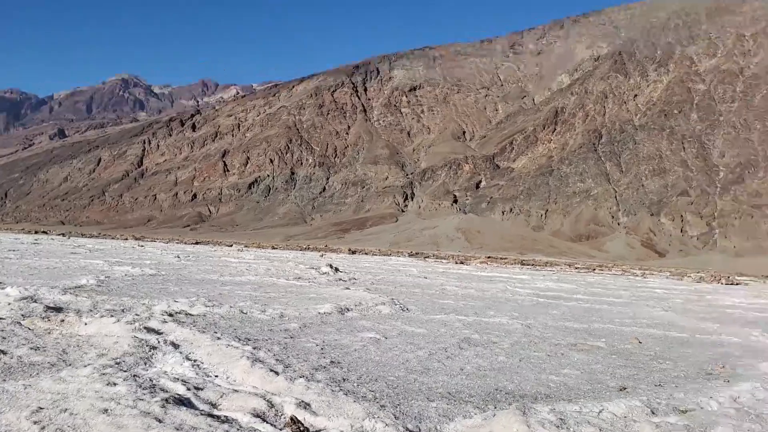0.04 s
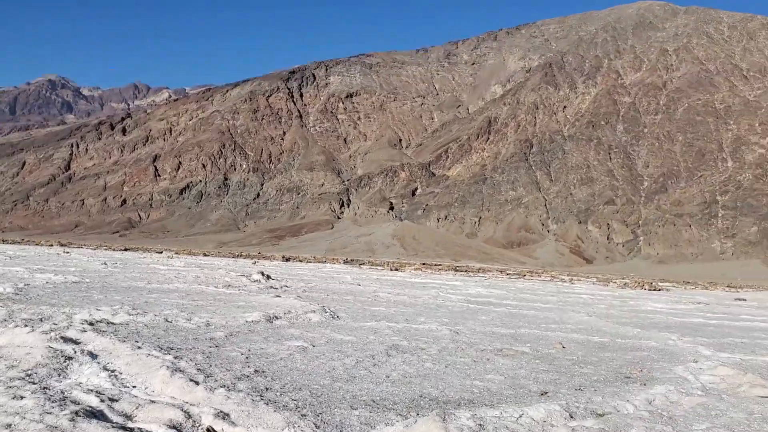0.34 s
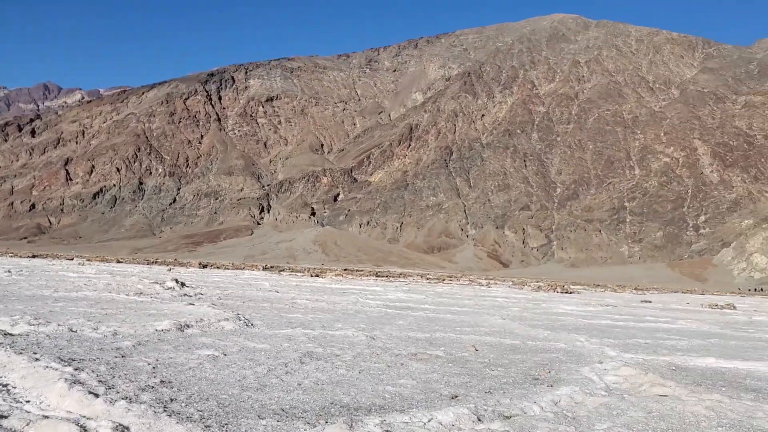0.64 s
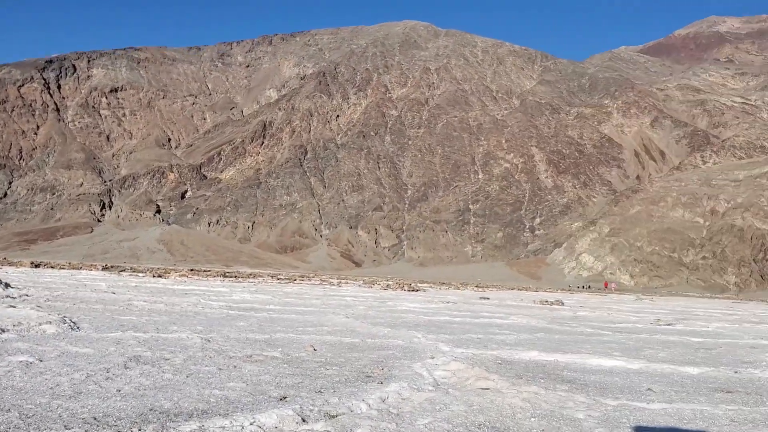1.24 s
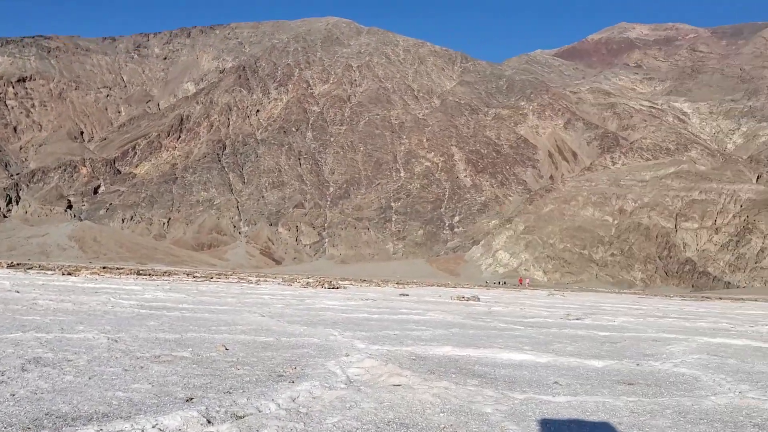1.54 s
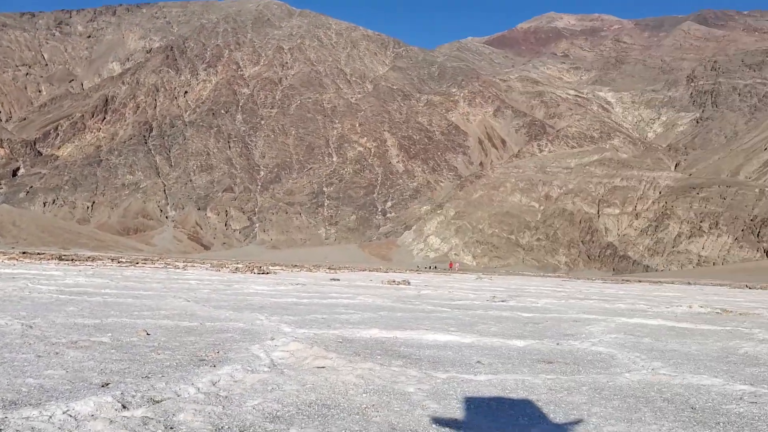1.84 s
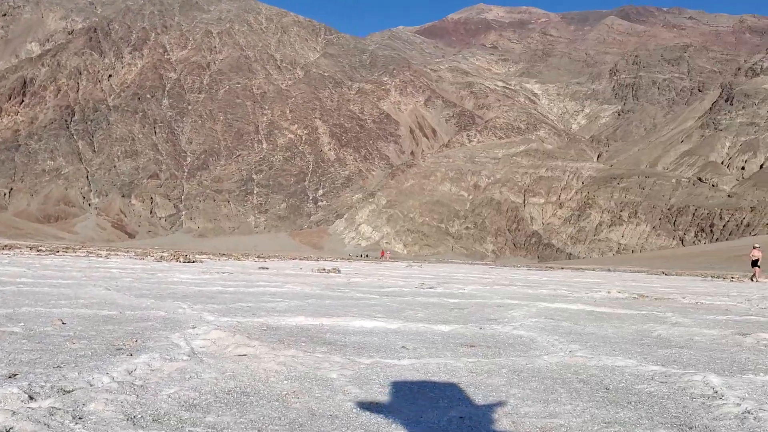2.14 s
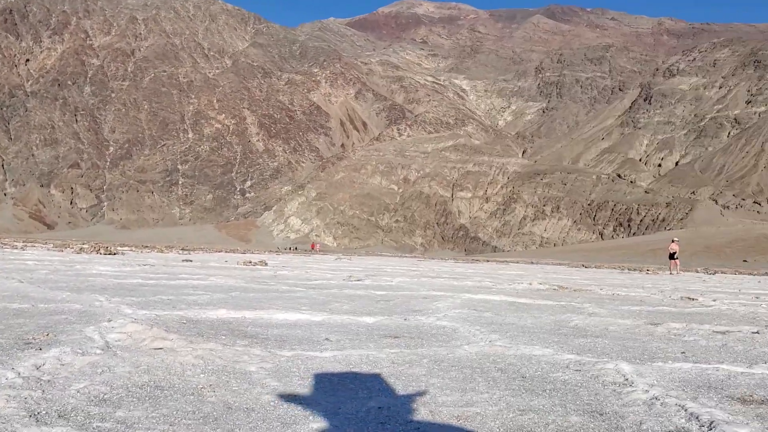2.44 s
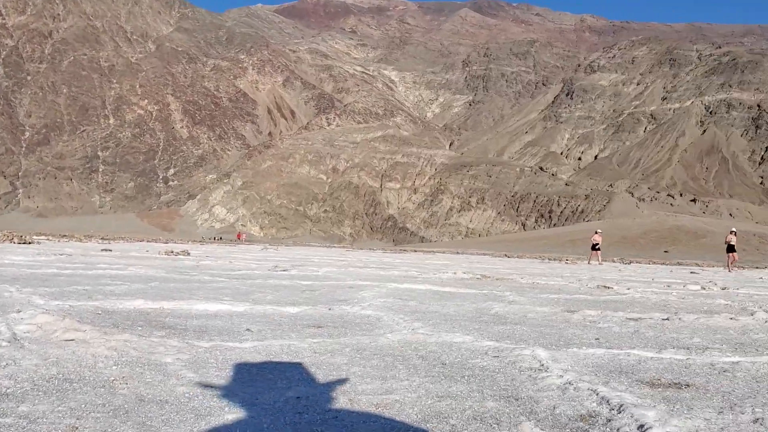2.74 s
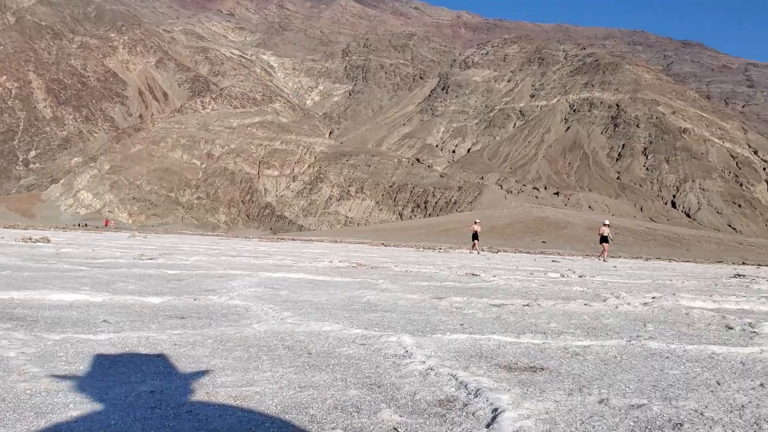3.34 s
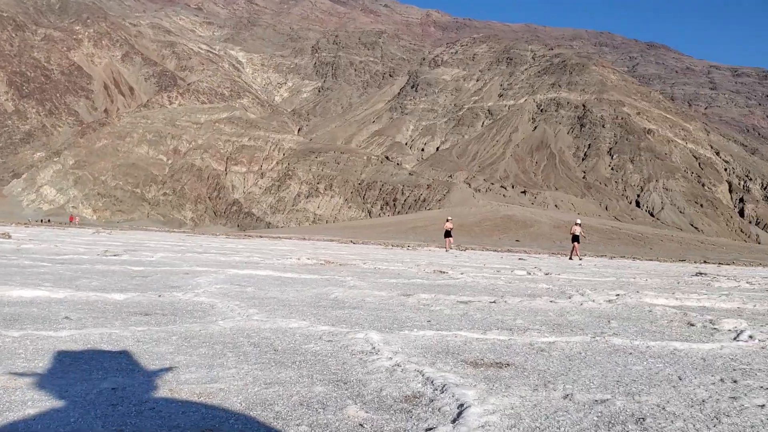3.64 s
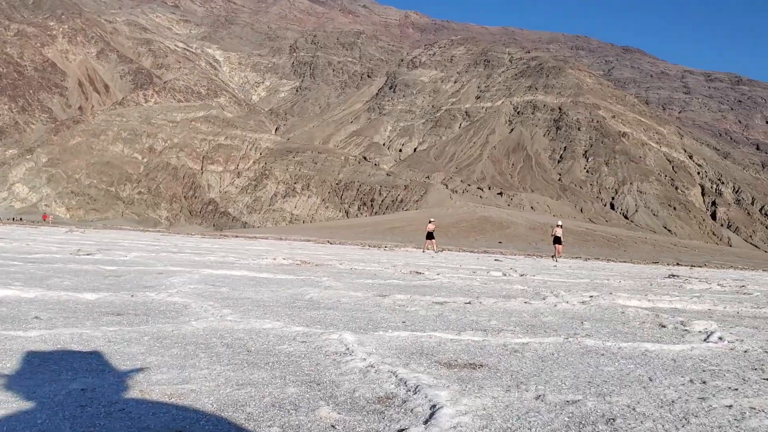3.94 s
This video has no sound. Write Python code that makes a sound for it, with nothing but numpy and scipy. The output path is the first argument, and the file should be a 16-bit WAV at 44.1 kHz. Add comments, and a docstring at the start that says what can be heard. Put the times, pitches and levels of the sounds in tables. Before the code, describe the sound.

Slow footsteps crunch on a dry salt crust, with a light wind rumble.

```python
"""Thin plates of salt crack under slow steps on a dry salt flat, in open air with no echo.
Each break rings its plate, the crust around it and the hollow below: a short hollow tick.
Crystals snap, loose flakes tick, grit grinds and crust crumbles under a softly scuffing sole.
A light wind rumbles on the two microphone ports over a faint hiss."""
import sys
import numpy as np
from scipy import signal
from scipy.fft import rfft, irfft
from scipy.io import wavfile
from scipy.ndimage import uniform_filter1d

SR = 44100
rng = np.random.default_rng(int(sys.argv[2]) if len(sys.argv) > 2 else 0)


def persist_wave(psi):
    """Save psi, clipped to +-1, as 16-bit WAV."""
    counts = np.round(np.clip(psi, -1, 1) * 32767).astype(np.int16)
    wavfile.write(sys.argv[1], SR, np.atleast_2d(counts).T)


N = 176400
TIME_S = np.arange(N) / SR
CRACK_RISE_S, CRACK_DECAY_S = 0.0008, 0.0031
CRUMB_S, GRIT_PAN_DB = 0.0025, -4.5   # pan: left minus right throughout


def from_db(db):
    """Decibels to gain."""
    return 10 ** (np.asarray(db) / 20)


def unit_rms(x):
    """Scale to rms 1."""
    return x / np.sqrt(np.mean(x ** 2) + 1e-20)


def unit_tick(x):
    """Scale each channel to the energy of 1 ms at rms 1."""
    return x / np.sqrt(np.sum(x ** 2, axis=-1, keepdims=True) / (SR / 1000) + 1e-20)


def panned(pan_db):
    """Left and right gains, rms 1."""
    return unit_rms(from_db([[pan_db / 2], [-pan_db / 2]]))


def placed(sound, pan_db):
    """Sound from one side: louder at the near port, later at the far one."""
    max_lag_s, knee_db = 0.00012, 4.5
    lag = int(np.round(max_lag_s * SR * np.tanh(pan_db / knee_db)))
    left, right = np.roll(sound[0], max(-lag, 0)), np.roll(sound[1], max(lag, 0))
    return panned(pan_db) * np.array([left, right])


def port_noise(size):
    """White noise, partly shared by the two ports."""
    correlation = 0.1
    white = rng.standard_normal((3, size))
    return np.sqrt(correlation) * white[2] + np.sqrt(1 - correlation) * white[:2]


def band(x, low_hz, high_hz):
    """Causal band-pass."""
    return signal.sosfilt(signal.butter(2, [low_hz, high_hz], "band", fs=SR, output="sos"), x)


def ring(x, hz, t60_s):
    """One damped resonance."""
    r = np.exp(-np.log(1000) / (t60_s * SR))
    return signal.lfilter([1, 0, -1], [1, -2 * r * np.cos(2 * np.pi * hz / SR), r * r], x)


def mode_tick(push, hz, t60_s, band_ratio=1.615):
    """Unit tick of one mode, band-limited to a frequency ratio either side."""
    return unit_tick(band(ring(push, hz, t60_s), hz / band_ratio, hz * band_ratio))


def coloured(x, colour):
    """Shape by a spectrum of (frequency [Hz], gain [dB]) points; rms 1."""
    hz, db = np.transpose(colour)
    bins_hz = np.maximum(np.arange(N // 2 + 1) * SR / N, 1)
    gain = from_db(np.interp(np.log(bins_hz), np.log(hz), db))
    return unit_rms(irfft(rfft(x) * gain, N))


def add(out, start_s, sound):
    """Mix in a short sound."""
    i = max(int(start_s * SR), 0)
    out[:, i:i + sound.shape[1]] += sound[:, :max(N - i, 0)]


def swell(centre_s, half_width_s, db):
    """Gaussian envelope; half-width at 1/e."""
    return from_db(db) * np.exp(-((TIME_S - centre_s) / half_width_s) ** 2)


def fracture(rise_s, decay_s):
    """One clean break amid tiny ones of equal total energy that build up and die away."""
    since_s = np.arange(2048) / SR - rise_s
    push = port_noise(len(since_s)) * np.exp(-np.maximum(since_s / decay_s, -2 * since_s / rise_s))
    push /= np.sqrt(np.sum(push ** 2, axis=1, keepdims=True))
    push[:, int(rise_s * SR)] += 1
    return push


def grains(colour, per_s, spread_db, decay_s):
    """Random tiny breaks of uneven size, each a dying noise burst; rms 1."""
    born = rng.random(N) < per_s / SR
    sizes = from_db(spread_db * np.minimum(rng.exponential(1, N), 4))
    power = signal.lfilter([1], [1, -np.exp(-2 / (decay_s * SR))], born * sizes ** 2 + 1e-18)
    return coloured(np.sqrt(power) * port_noise(N), colour)


def wind():
    """Separate eddies at each port: a steady breeze plus short gusts that favour one side."""
    # eddy spectrum: (frequency [Hz], gain [dB])
    colour = [(15, -4), (30, -5.5), (48, 1.5), (64, 3.5), (85, -3.5), (115, -10.5), (160, -20),
              (220, -29.5), (400, -52.5), (1500, -72)]
    # gusts: (centre [s], half-width [s], level [dB], pan [dB])
    gusts = [(-0.001, 0.061, -38.5, 1.5), (0.089, 0.014, -39.5, -17), (0.34, 0.02, -41.5, -16),
             (0.413, 0.039, -44, -18), (0.506, 0.023, -41, 9), (0.68, 0.16, -46.5, -30),
             (1.235, 0.049, -41, 14), (1.302, 0.027, -39.5, -15), (1.502, 0.02, -40, -24),
             (1.589, 0.092, -46, 21), (2.25, 0.092, -48.5, 25), (2.596, 0.062, -47.5, 2),
             (2.935, 0.02, -43, -17), (3.128, 0.1, -46, -25), (3.241, 0.026, -35, -15),
             (3.315, 0.045, -31, -4.5), (3.433, 0.24, -47.5, -36), (3.677, 0.043, -42.5, -9),
             (3.858, 0.026, -41.5, -14)]
    breeze_db, levelling_s = -52.5, 0.08
    eddies = coloured(rng.standard_normal((2, N)), colour)
    eddies /= np.sqrt(uniform_filter1d(eddies ** 2, size=int(levelling_s * SR), axis=1))
    gust_power = sum((swell(s, half_s, db) * panned(pan_db)) ** 2 for s, half_s, db, pan_db in gusts)
    return eddies * np.sqrt(from_db(breeze_db) ** 2 + gust_power)


def hiss():
    """Faint steady background."""
    # hiss spectrum: (frequency [Hz], gain [dB])
    colour = [(100, 15), (250, 7), (450, 1.5), (1000, 0.5), (2000, -1), (3300, 0.5), (4400, -5.5),
              (5400, -1), (8200, -9), (9200, -24), (11500, -13), (15500, -10)]
    return from_db(-67) * panned(pan_db=1.5) * coloured(rng.standard_normal((2, N)), colour)


def stray_crumbs():
    """Small crumbs give way throughout, with faint ticks."""
    # crumb spectrum: (frequency [Hz], gain [dB])
    colour = [(250, 0.5), (900, 0), (2200, -3), (4300, -5.5), (5800, -1), (9300, -21), (15000, -7.5)]
    return from_db(-74) * panned(GRIT_PAN_DB) * grains(colour, per_s=23, spread_db=0.68, decay_s=CRUMB_S)


def plate_cracks():
    """Each break rings its plate briefly and shakes the crust and the hollow below."""
    # plate breaks: (time [s], level [dB], pitch [Hz], knock re tick [dB], pan [dB])
    cracks = [(0.0549, -44.5, 2270, -30.0, -6), (0.1194, -41, 2030, -17, 8), (0.1241, -37, 2310, -23, 6),
              (0.1652, -41, 2230, -39, -5), (0.2437, -40.5, 2060.0, -29, -6), (0.2621, -38, 2040, -23, 1.0),
              (0.3063, -42, 2200, -20, -4.5), (0.372, -43.0, 2090, -29, -3.5), (0.4081, -40, 2550, -9, 13),
              (0.4311, -42.5, 2230, -22, -5), (0.4736, -44.5, 2050, -27, -4.5),
              (0.5625, -44.5, 2060, -19.0, -7.5), (0.599, -41.5, 2070, -28, -9),
              (0.6435, -44.5, 1840, -15, -4.0), (0.6568, -35.5, 2000, -17, 4.5),
              (0.6712, -37.5, 2120.0, -15, 0.5), (0.6795, -40, 2080, -13, 1),
              (0.6827, -40.0, 2120, -12, 4.5), (0.6973, -39.0, 2130.0, -24, 2),
              (0.72, -36.5, 2030, -15, -3), (0.7281, -40.5, 2220.0, -15, -2),
              (0.7392, -41.5, 2300, -22, 10), (0.7481, -38, 1980, -13, -7.0),
              (0.7544, -41.5, 2340.0, -11.5, 1), (0.7798, -42, 2270, -10, 1),
              (0.7841, -37, 2030, -16.5, -5.0), (0.8197, -31.5, 1910, -22, -6.5),
              (0.8834, -39, 1935, -8.5, 4.0), (0.989, -51, 2160, -33, -13), (0.9977, -37, 1930, -19, -4),
              (1.0283, -39.5, 1950, -19, -4), (1.0702, -40, 1940, -16.0, -5.5),
              (1.1053, -42.0, 1910, -17, -7), (1.137, -42, 2000, -19, -4.5), (1.1679, -37.5, 1950, -20, 3),
              (1.2035, -41.0, 2080, -14.5, -6), (1.2331, -45, 1950.0, -11, -5.5),
              (1.2514, -46, 2070, -23, -1.0), (1.2733, -41, 2260, -17, 2), (1.2802, -45, 2240, -17.0, -8),
              (1.296, -37.5, 1980, -26, -0.5), (1.3265, -43.5, 2050, -25, -3),
              (1.3582, -40.5, 1950, -12, -6), (1.4581, -37, 2180, -25, 2), (1.6811, -44.5, 2340, -14, 6),
              (1.7219, -47.5, 2060, -16.0, -3.5), (1.7453, -43, 2060, -17, 2),
              (1.8062, -36, 2200, -10, 0.5), (2.0032, -47.5, 2010, -7, 2), (2.0268, -40.5, 1980, -25, -1.5),
              (2.0461, -40.5, 2340, -13, -1.5), (2.0764, -46, 2230, -20, -3), (3.2225, -50, 1880, -4, 0),
              (3.6551, -47, 1970, -8, -0.5)]
    # crust modes around the foot: (frequency [Hz], level re plate [dB], t60 [s])
    crust_modes = [(355, -22.5, 0.022), (1012, -18.5, 0.031), (1386, -10, 0.02), (1944, -6.5, 0.011),
                   (2370, -17.5, 0.015), (5720, -15.5, 0.0054)]
    trim_db, knock_trim_db = -0.5, -2
    spot_spread = 0.055   # relative mode shift from spot to spot
    out = np.zeros((2, N))
    for s, db, hz, knock_db, pan_db in cracks:
        push = fracture(CRACK_RISE_S, CRACK_DECAY_S)
        tick = mode_tick(push, hz, t60_s=0.0057)
        for mode_hz, mode_db, t60_s in crust_modes:
            spot_hz = mode_hz * np.exp(spot_spread * rng.standard_normal())
            tick += rng.choice([-1, 1]) * from_db(mode_db) * mode_tick(push, spot_hz, t60_s)
        knock = unit_tick(band(ring(push, hz=690, t60_s=0.0048), 360, 830))
        crack = unit_tick(tick) + from_db(knock_db + knock_trim_db) * knock
        add(out, s - 2 * CRACK_RISE_S, from_db(db + trim_db) * placed(crack, pan_db))
    return out


def grinding():
    """Under each press of the sole, loose grit grinds and the crust crumbles."""
    # presses: (centre [s], half-width [s], grit level [dB], crumb level [dB])
    presses = [(0.124, 0.038, -67.5, -59), (0.503, 0.12, -66.5, -62), (0.754, 0.12, -59, -58),
               (1.05, 0.11, -66, -58.5), (1.326, 0.12, -60, -59.5), (1.535, 0.049, -64.5, -61.5),
               (1.798, 0.26, -62.5, -66.5), (2.034, 0.04, -61.5, -64), (2.62, 0.99, -75.5, -70),
               (3.669, 0.07, -62, -70.5), (3.78, 0.35, -69.5, -81)]
    # grit spectrum: (frequency [Hz], gain [dB])
    grit_colour = [(300, -4.5), (1000, -2), (2500, 8.5), (4300, 0.5), (5800, 4), (8000, 0.5), (9300, -13.5),
                   (11500, -5.5), (15500, -4)]
    # crumbling crust spectrum: (frequency [Hz], gain [dB])
    crumb_colour = [(200, 8), (400, -11), (900, -7), (1400, -1), (2000, 6.5), (2600, -4), (3400, -6),
                    (4500, -38), (9000, -26.5)]
    grit_envelope = np.sqrt(sum(swell(s, half_s, db) ** 2 for s, half_s, db, _ in presses))
    crumb_envelope = np.sqrt(sum(swell(s, half_s, db) ** 2 for s, half_s, _, db in presses))
    grit = grains(grit_colour, per_s=1400, spread_db=4, decay_s=0.0003)
    crumbs = grains(crumb_colour, per_s=220, spread_db=-0.5, decay_s=CRUMB_S)
    return (from_db(-0.5) * grit_envelope * placed(grit, GRIT_PAN_DB)
            + from_db(-1.5) * crumb_envelope * placed(crumbs, pan_db=0.5))


def flake_ticks():
    """Loose pieces break, each ticking around one pitch without shaking the crust."""
    # flake breaks: (time [s], level [dB], pitch [Hz], pan [dB])
    flakes = [(.1238, -46.5, 536, 25), (.8433, -47, 3860, -6.5), (2.0755, -56, 1045, -4),
              (2.6395, -56.5, 2780, -2.5), (3.079, -55.5, 770, -13), (3.1162, -58, 3400, 0.5),
              (3.482, -50, 2250, 0), (3.567, -46, 2660, -3.5), (3.647, -52.5, 2270, 5),
              (3.7073, -47, 2280, -8), (3.85, -43.5, 2930, 1.5), (3.9169, -43.5, 2700, 1.5),
              (3.9953, -53, 3250, -3)]
    trim_db, t60_cycles = 4, 12
    out = np.zeros((2, N))
    for s, db, hz, pan_db in flakes:
        push = fracture(CRACK_RISE_S, CRACK_DECAY_S)
        tick = mode_tick(push, hz, t60_cycles / hz, band_ratio=1.35)
        add(out, s - 2 * CRACK_RISE_S, from_db(db + trim_db) * placed(tick, pan_db))
    return out


def crystal_snaps():
    """Crystals break with a short bright click."""
    # crystal breaks: (time [s], treble level [dB], top treble level [dB])
    snaps = [(0.1234, -58, -63), (0.215, -48.5, -65), (0.407, -54.5, -61), (0.4559, -56, -58),
             (0.679, -52, -64), (0.7255, -49.5, -67), (0.737, -54, -78), (0.7514, -50, -66),
             (0.7836, -50, -70), (0.816, -52, -65), (0.842, -46.5, -64), (0.8816, -53.5, -66),
             (1.2252, -43.5, -48.5), (1.232, -47, -62), (1.2922, -54, -66), (1.367, -54.5, -67),
             (1.4547, -53.5, -60.5), (1.8049, -45, -72), (1.9828, -50.5, -80), (2.046, -55, -65),
             (2.1106, -54, -82), (2.735, -57.5, -69), (2.8806, -50.5, -70), (2.9557, -56, -82),
             (3.0143, -49, -65), (3.2194, -49.5, -67), (3.3583, -54.5, -65.5), (3.5677, -50.5, -67.5),
             (3.6536, -49, -81), (3.7983, -51, -74)]
    body_trim_db, treble_trim_db, top_trim_db = -1, 0.5, 12
    out = np.zeros((2, N))
    for s, treble_db, top_db in snaps:
        push = fracture(rise_s=0.0012, decay_s=0.0019)
        body = from_db(treble_db + body_trim_db) * unit_tick(band(push, 1360, 3370))
        treble = from_db(treble_db + treble_trim_db) * unit_tick(band(push, 4450, 6560))
        top = from_db(top_db + top_trim_db) * unit_tick(band(push, 14400, 21050))
        add(out, s, placed(body + treble + top, pan_db=-3.5))
    return out


def sole_scuffs():
    """The sole presses down with a soft, low scuff."""
    # scuffs: (centre [s], half-width [s], level [dB])
    scuffs = [(0.398, 0.024, -68.5), (.78, 0.066, -84), (1.12, 0.24, -75.5), (3.068, 0.06, -64.5),
              (3.247, 0.07, -71.5)]
    # scuff spectrum: (frequency [Hz], gain [dB])
    colour = [(100, -17), (250, 6.5), (550, 2), (900, -11.5), (1500, -22), (4000, -51)]
    return sum(swell(*scuff) for scuff in scuffs) * coloured(port_noise(N), colour)


def scene():
    """Steps, wind and hiss."""
    steps = plate_cracks() + flake_ticks() + crystal_snaps() + grinding() + sole_scuffs()
    return steps + stray_crumbs() + wind() + hiss()


def record(dry):
    """Steep low-pass."""
    cutoff_hz = 15900
    return signal.sosfilt(signal.ellip(10, .2, 70, cutoff_hz, fs=SR, output="sos"), dry)


dry = scene()
out = record(dry)
persist_wave(out)
```